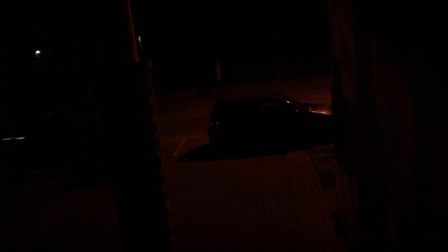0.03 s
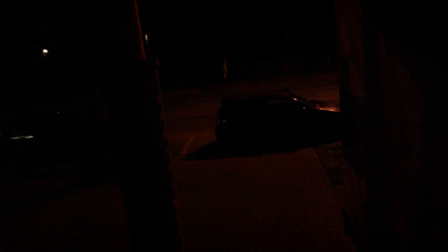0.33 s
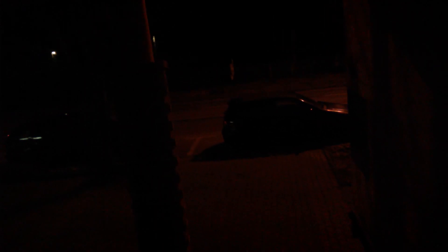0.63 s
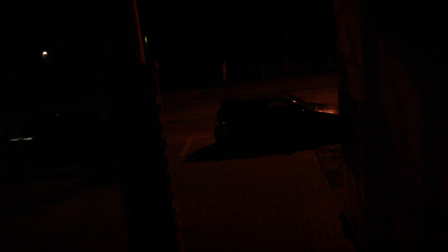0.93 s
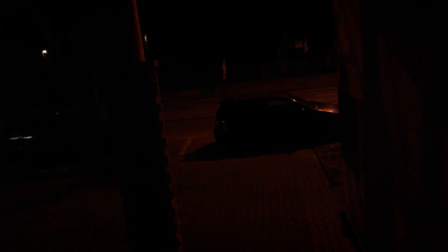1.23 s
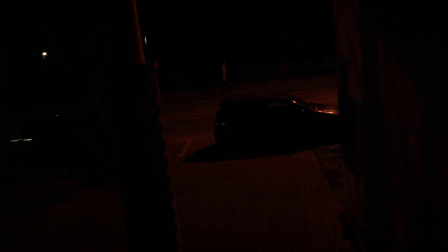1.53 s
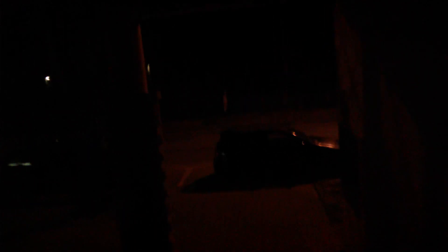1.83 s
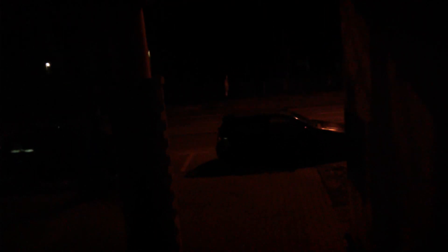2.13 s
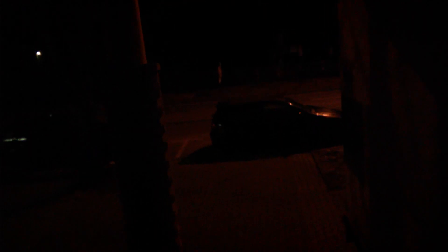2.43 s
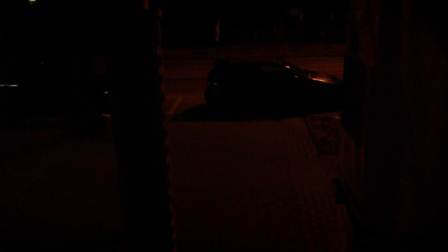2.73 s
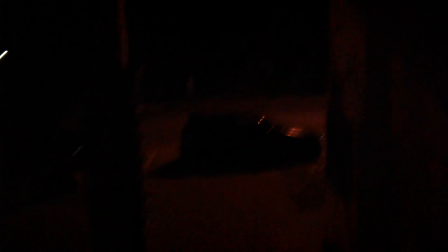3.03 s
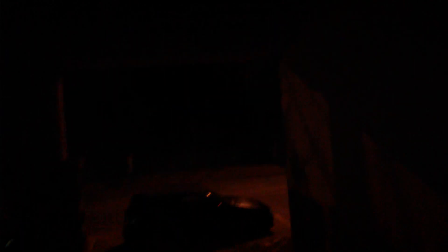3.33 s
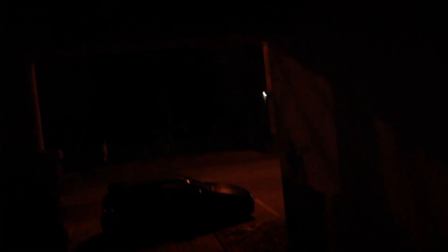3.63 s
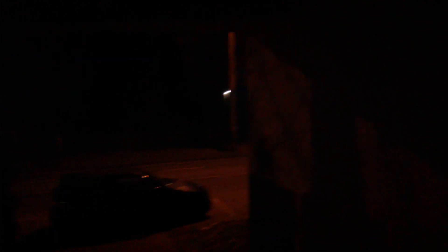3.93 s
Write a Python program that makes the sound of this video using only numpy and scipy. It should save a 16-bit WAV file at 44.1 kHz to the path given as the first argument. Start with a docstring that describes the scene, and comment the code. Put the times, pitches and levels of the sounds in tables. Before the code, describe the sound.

A loud buzzing electric arc breaks a street's quiet, followed by wind gusts on the microphone.

```python
"""A quiet night street: distant town noise, a faint rustle and small squeaks close by.
At 1.5 s an arc strikes on an overhead rail line, its sparks a crackling roar over a mains hum.
It nearly dies at 1.8 s and strikes again, while the house fronts ring on.
From 2.8 s air buffets the moving microphone and overloads it.
Under the gusts the arc nearly dies once more, then strikes hard at 3.8 s."""
import sys
import numpy as np
from scipy import signal
from scipy.fft import rfft, irfft
from scipy.io import wavfile
from scipy.ndimage import uniform_filter1d

SR = 44100
rng = np.random.default_rng(int(sys.argv[2]) if len(sys.argv) > 2 else 0)


def digitize_waveform(pressure):
    """Quantize a signal to 16-bit integers and store it at the path in sys.argv[1].

    Rows of a 2-D input are taken as channels; values are limited to [-1, 1].
    """
    field = np.atleast_2d(pressure).T
    bounded = np.clip(field, -1, 1)
    quanta = np.round(bounded * 32767).astype(np.int16)
    wavfile.write(sys.argv[1], SR, quanta)


N = 176400
T = np.arange(N) / SR
HZ = np.fft.rfftfreq(2 * N, 1 / SR)

# The arc's two faders. Each row: time in seconds, roar in dB, sizzle in dB.
ARC_LEVELS = [(1.484, -18.5, -33), (1.493, -21, -20.5), (1.515, -27.5, -28.5), (1.58, -21.5, -36),
              (1.6, -22, -23), (1.67, -26, -40), (1.73, -28, -43), (1.81, -26.5, -59), (1.838, -21, -58),
              (1.848, -18.5, -22.5), (1.9, -19, -31.5), (1.95, -26, -31), (2.0, -28.5, -32.5),
              (2.055, -26, -42), (2.068, -18.5, -29), (2.11, -24.5, -34), (2.145, -20.5, -28),
              (2.18, -22, -31.5), (2.28, -23.5, -30.5), (2.37, -23.5, -35), (2.55, -20.5, -27.5),
              (2.62, -23.5, -32), (2.76, -21, -28.5), (2.86, -20.5, -25.5), (2.92, -19, -29.5),
              (2.96, -22.5, -31), (3.12, -21.5, -30.5), (3.29, -21, -29), (3.43, -17.5, -29),
              (3.6, -29.5, -35), (3.68, -37, -48), (3.829, -27, -55), (3.832, -11, -23), (3.86, -20, -29),
              (3.91, -20.5, -31), (4.0, -32, -46)]
# The arc's body and its top end. Each row: frequency in Hz, relative gain in dB.
ROAR_EQ = [(25, -59), (50, -17), (80, 1), (130, -5), (250, -2.5), (370, 2), (460, -2.5), (620, -1.5),
           (1000, 2), (1500, 3.5), (1980, 4.5), (2170, -2.6), (2380, -9), (2650, -15), (3600, -20),
           (5000, -27), (9000, -50), (16000, -79)]
SIZZLE_EQ = [(100, -69), (1500, -3.5), (2700, -2.5), (3800, 2.5), (4700, 0), (5650, 6), (6500, 1),
             (7600, 3), (8400, -0.5), (9400, -0.5), (10500, -9.5), (12000, -18.5), (15700, -26)]
# Single loud discharges. Each row: start in seconds, level in dB, sizzle offset in dB.
SNAPS = [(1.503, -6, -25), (1.601, -11, -1), (1.882, -13.5, -4), (2.063, -12, -6), (2.086, -8, -15),
         (2.129, -15, 2), (2.142, -11.5, -22), (2.151, -6.5, -19), (2.863, -17, -13), (2.915, -14, -13),
         (2.927, -28, -10), (3.315, -17, -14), (3.835, -12, -13)]
# Narrow flares and low thumps in the arc's surges.
# Each row: centre in seconds, half length in seconds, pitch in Hz, width in Hz, level in dB.
FLARES = [(1.52, 0.048, 5960, 800, -32.5), (1.61, 0.0095, 6420, 1500, -27),
          (1.895, 0.0071, 4400, 1600, -29.5), (2.1, 0.031, 1450, 800, -21.5),
          (2.54, 0.017, 3900, 1500, -33), (2.081, 0.0052, 4200, 2600, -26.5), (2.81, 0.015, 3670, 600, -36),
          (2.865, 0.027, 5600, 800, -30.5), (2.9, 0.037, 1745, 800, -22.5)]
THUMPS = [(1.508, 0.01, 385, 110, -24), (1.604, 0.0058, 378, 110, -20.5), (1.895, 0.0093, 373, 100, -22),
          (2.14, 0.023, 375, 100, -26)]
# Ripple in the arc's low treble. Each row: frequency in Hz, depth from 0 to 1.
COMB_DEPTH = [(2000, 0), (2250, 0.23), (2500, 0.76), (2830, 1), (3500, 0.54), (3850, 0.7), (4200, 0.5),
              (4700, 0), (5300, 0.2)]
# The hum's harmonics, as multiples of the mains frequency.
HARMONICS = [2, 4, 8]
# Their voicing. Each row: base level in dB, waver from 0 to 1.
HUM_VOICING = [(-34.5, 0.63), (-30, 0.25), (-36.5, 0.4)]
# Weaker tones in the hum. Each row: pitch in Hz, base level in dB, waver from 0 to 1.
SIDE_TONES = [(137.8, -38.5, 0.25), (358, -35, 0.74), (529, -38, 0.7)]
# The ring of the house fronts. Each row: frequency in Hz, seconds to fall by 60 dB.
STREET_DECAY = [(100, 1), (500, 1.66), (1600, 1.41), (4000, 1.23), (8000, 0.6), (16000, 0.36)]

# Air on the microphone. Each row: time in seconds, strength in dB.
GUSTS = [(1.1, -81), (1.16, -62), (1.45, -56), (1.8, -49), (2.72, -38), (2.75, -37), (2.82, -18.5),
         (2.86, -44), (2.89, -18.5), (2.925, -22.5), (2.96, -21), (2.99, -9), (3.012, -23), (3.03, -8.5),
         (3.068, -8.5), (3.09, -30), (3.12, -31), (3.14, -8.5), (3.195, -6.5), (3.235, -13.5),
         (3.26, -10.5), (3.28, -26), (3.376, -14), (3.42, -15.5), (3.464, -7.5), (3.488, -5.5),
         (3.516, -25.5), (3.538, -9), (3.574, -30), (3.615, -13.5), (3.63, -13), (3.654, -12.5),
         (3.675, -23.5), (3.75, -17), (3.785, -22), (3.8, -12), (3.82, -13), (3.85, -12.5), (3.875, -23),
         (3.914, -9), (3.93, -17.5), (3.948, -10.5), (3.97, -17.5), (4.0, -13.5)]
# Sharp slaps of air. Each row: centre in seconds, level in dB.
SLAPS = [(3.65, -12), (3.804, -9), (3.955, -7.5)]
# Tone of soft gusts, hard gusts and slaps. Each row: frequency in Hz, relative gain in dB.
SOFT_WIND_EQ = [(20, -12), (38, -15), (58, -1), (85, -3), (125, 2), (165, 1), (210, -2), (300, -6.5),
                (450, -31), (700, -23), (1500, -34), (16000, -105)]
HARD_WIND_EQ = [(20, -13), (80, -8), (200, 1), (330, 3), (500, -8), (800, -17), (1500, -35.5),
                (16000, -105)]
SLAP_EQ = [(60, -20), (250, -1.5), (480, -2), (800, -11), (1500, -23), (16000, -100)]

# A faint rustle's fader and two bright ticks. Each row: time in seconds, level in dB.
RUSTLE_LEVELS = [(0, -66), (.05, -67), (.082, -52.5), (.11, -62), (.26, -64), (.38, -71), (.52, -72),
                 (.58, -65.5), (.67, -63), (.73, -67.5), (.89, -68.5), (1.08, -76), (1.22, -67),
                 (1.35, -77), (1.48, -70)]
TICKS = [(.157, -61), (2.934, -23.5)]
# Tone of the town, the rustle and the ticks. Each row: frequency in Hz, relative gain in dB.
TOWN_EQ = [(15, -30), (28, -11), (45, -10), (80, -13), (130, -5.5), (200, -1), (350, 1.5), (470, -5.5),
           (900, -7), (1100, -14), (1650, -16.5), (2100, -22.5), (2500, -30), (3100, -42), (4200, -37),
           (6700, -34), (8300, -31), (12000, -35), (15500, -40)]
RUSTLE_EQ = [(500, -35), (3200, -19), (4000, -11.5), (5300, -5.5), (6300, -7), (8600, 0.5), (10000, -5.5),
             (12000, -16), (16000, -13)]
TICK_EQ = [(500, -30), (4000, -19), (8500, 2), (12000, -17), (16000, -17)]
# Faint squeaks close by and a distant swell in the town noise.
# Each row: centre in seconds, half length in seconds, pitch in Hz, width in Hz, level in dB.
SQUEAKS = [(.035, .017, 3920, 300, -75), (.07, .015, 5700, 500, -67), (.085, .01, 8650, 500, -64),
           (.305, .03, 5130, 300, -71), (.38, .06, 5220, 220, -79), (.295, .018, 4000, 400, -74)]
TOWN_SWELLS = [(1.24, 0.051, 860, 800, -54.5)]

MAINS_HZ, STRIKE_S = 50, ARC_LEVELS[0][0]
WET_DB, DIRECT_DB, ECHO_DB = -3.5, -2.5, -18


def arc(flicker_db=2.5, snap_s=.0017):
    """Sparks make a flickering roar and sizzle in the street; a few snap loudly."""
    burn = sparks() * unit(amp(flicker_db * drift(hz=49.5))) * (T >= STRIKE_S)
    snaps = noise() * bursts([(start, db) for start, db, _ in SNAPS], snap_s)
    spits = noise() * bursts([(start, db + offset) for start, db, offset in SNAPS], snap_s)
    roar = colour(street(burn * amp(curve(ARC_LEVELS)) + snaps) + cracks(), ROAR_EQ)
    sizzle = colour(street(burn * amp(curve(ARC_LEVELS, column=2)) + spits), SIZZLE_EQ)
    surges = (swells(FLARES) + swells(THUMPS)) * (T >= ARC_LEVELS[1][0])
    return roar + sizzle + surges


def sparks(per_second=3600, spread_db=3.5, pulsing=.24):
    """Tiny discharges of uneven size, crowding at each crest of the mains."""
    crowding = 1 + pulsing * np.cos(2 * np.pi * 2 * MAINS_HZ * T)
    size = amp(spread_db * np.minimum(rng.exponential(1, N), 4))
    polarity = rng.choice([-1, 1], N)
    fires = rng.random(N) < crowding * per_second / SR
    return unit(size * polarity * fires)


def cracks(push_s=.00013, boost_db=1):
    """Each snap leads with a shock front: a sharp push of air and its short suction."""
    fronts = np.zeros(N)
    for start, db, _ in SNAPS:
        age = np.maximum(T - start, 0) / push_s
        fronts += amp(db + boost_db) * (age > 0) * (1 - age) * np.exp(-age)
    return fronts


def ripple(x, spacing_hz=334):
    """A copy 3 ms late combs the low treble."""
    depth = at_hz(COMB_DEPTH, HZ)
    comb = (1 + depth * np.exp(-2j * np.pi * HZ / spacing_hz)) / np.sqrt(1 + depth ** 2)
    return irfft(rfft(x, 2 * N) * comb)[:N]


def hum(attack_s=.015, follow=.21, waver_hz=6.7):
    """The hot channel throbs with the current, wavering as it writhes."""
    attack = np.clip((T - STRIKE_S) / attack_s, 0, 1)
    ride = amp(follow * (curve(ARC_LEVELS) + 17))  # gently tracks the roar's fader
    harmonics = [(k * MAINS_HZ, db, waver) for k, (db, waver) in zip(HARMONICS, HUM_VOICING)]
    tones = np.zeros(N)
    for hz, db, waver in harmonics + SIDE_TONES:
        wobble = 1 + waver * (drift(waver_hz) + 1j * drift(waver_hz))
        tones += amp(db) * unit((wobble * np.exp(2j * np.pi * hz * T)).real)
    return attack * ride * tones


def street(x, paths=8, hold_s=.03):
    """The arc writhes, so its paths through the street keep changing."""
    path = (T // hold_s).astype(int) % paths
    return sum(signal.fftconvolve(x * (path == k), street_response())[:N] for k in range(paths))


def street_response():
    """Direct sound, a few wall echoes and a tail whose treble dies first."""
    hz, t, bands = signal.stft(noise()[:2 * SR], SR, nperseg=256)
    decay = amp(-60 * t / at_hz(STREET_DECAY, hz)[:, None])
    tail = signal.istft(bands * decay, SR, nperseg=256)[1]
    tail[:200] = 0  # pre-delay
    response = amp(WET_DB) * tail / np.linalg.norm(tail)
    response[0] += amp(DIRECT_DB)
    echoes = (rng.uniform(.006, .06, size=6) * SR).astype(int)
    response[echoes] += amp(ECHO_DB) * rng.choice([-1, 1], size=6)
    return response


def wind(soft_db=-2, hard_db=4, hard_growth=1.81, slap_s=.0052):
    """Air buffets the microphone; hard gusts reach higher, and a few slap it."""
    gust_db = curve(GUSTS)
    soft = amp(gust_db + soft_db) * eddies(SOFT_WIND_EQ)
    hard = amp(hard_growth * gust_db + hard_db) * eddies(HARD_WIND_EQ)
    slaps = sum(amp(db) * bell(centre, slap_s) for centre, db in SLAPS) * eddies(SLAP_EQ)
    return soft + hard + slaps


def eddies(eq):
    """Low turbulence of even strength."""
    rumble = colour(noise(), eq)
    power = abs(uniform_filter1d(rumble ** 2, size=1100))
    return rumble / np.sqrt(power + 1e-6)


def night(town_db=-53):
    """The bed: distant town noise, with a rustle, ticks and squeaks close by."""
    town = amp(town_db) * patchy(colour(noise(), TOWN_EQ), depth_db=2)
    rustle = colour(noise() * amp(curve(RUSTLE_LEVELS) + 1.7 * drift(hz=60)), RUSTLE_EQ)
    ticks = colour(noise() * bursts(TICKS, decay_s=.017), TICK_EQ)
    return town + rustle + ticks + swells(SQUEAKS) + swells(TOWN_SWELLS)


def patchy(x, depth_db):
    """Lets neighbouring bands swell and sink on their own."""
    bands = signal.stft(x, nperseg=1024, noverlap=768)[2]
    patches = uniform_filter1d(rng.standard_normal(bands.shape), size=8, axis=0)
    patches = unit(uniform_filter1d(patches, size=16, axis=1))
    return unit(signal.istft(bands * amp(depth_db * patches), nperseg=1024, noverlap=768)[1][:N])


def swells(rows):
    """Brief swells of noise in one resonance each."""
    mix = np.zeros(N)
    for centre, half_s, hz, width, db in rows:
        phase = 2 * np.pi * hz * T
        band = unit(drift(width / 2) * np.cos(phase) + drift(width / 2) * np.sin(phase))
        mix += amp(db) * bell(centre, half_s) * band
    return mix


def bell(centre, half_s):
    """Envelope that fades smoothly in and out."""
    return np.exp(-((T - centre) / half_s) ** 2 / 2)


def bursts(rows, decay_s):
    """Envelope of sudden, dying bursts."""
    return sum(amp(db) * (T >= start) * np.exp(-abs(T - start) / decay_s) for start, db in rows)


def colour(x, eq):
    """Minimum-phase EQ that keeps the power of white noise."""
    log_gain = np.log(unit(amp(at_hz(eq, HZ))) + 1e-6)
    mirrored = np.r_[log_gain, log_gain[-2:0:-1]]
    response = np.exp(np.conj(signal.hilbert(mirrored)))[:N + 1]
    return irfft(rfft(x, 2 * N) * response)[:N]


def curve(points, column=1):
    """Reads one column of a table along time."""
    rows = np.array(points)
    return np.interp(T, np.sort(rows[:, 0]), rows[:, column])


def at_hz(points, hz):
    """Reads a table along log frequency."""
    frequencies, values = np.transpose(points)
    return np.interp(np.log(hz + 1), np.log(frequencies + 1), values)


def drift(hz):
    """Random modulation up to a rate, rms 1."""
    return unit(irfft(rfft(noise(), 2 * N) / (1 + (HZ / hz) ** 4))[:N])


def noise():
    """White noise."""
    return rng.standard_normal(N)


def amp(db):
    """Decibels to gain."""
    return 10 ** (np.asarray(db) / 20)


def unit(x):
    """Scales to rms 1."""
    return x / np.sqrt(np.mean(x ** 2) + 1e-20)


def scene():
    """The mono mix: the arc and its hum, the wind and the night."""
    return (ripple(arc()) + hum() + wind() + night())[None]


def record(dry, ceiling=.69, knee=8, distortion_hz=4800, cutoff_hz=15750):
    """The microphone overloads softly, with dull distortion; a steep high cut follows."""
    clipped = dry / (1 + abs(dry / ceiling) ** knee) ** (1 / knee)
    distortion = irfft(rfft(clipped - dry, 2 * N) / (1 + (HZ / distortion_hz) ** 6))[:, :N]
    high_cut = signal.firwin(511, cutoff_hz, window=("kaiser", 9), fs=SR)
    return signal.oaconvolve(dry + distortion, high_cut[None], "same")


dry = scene()
out = record(dry)
digitize_waveform(out)
```